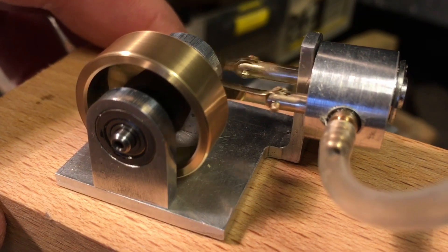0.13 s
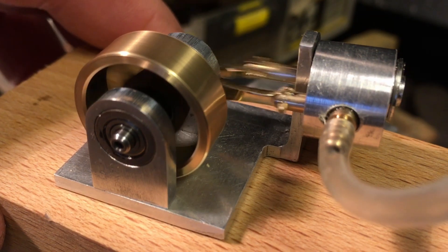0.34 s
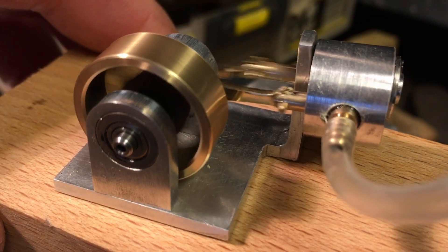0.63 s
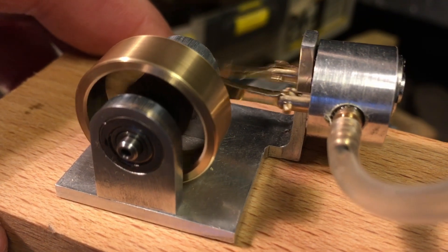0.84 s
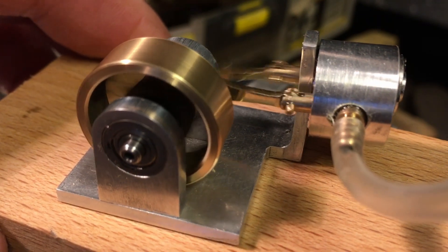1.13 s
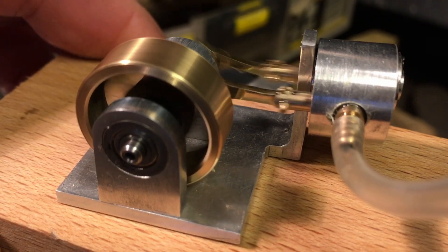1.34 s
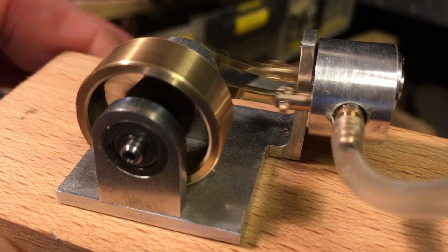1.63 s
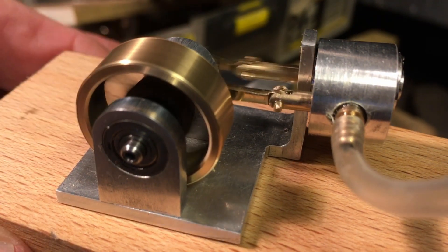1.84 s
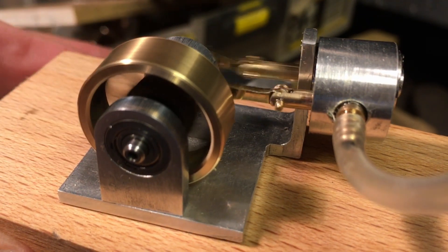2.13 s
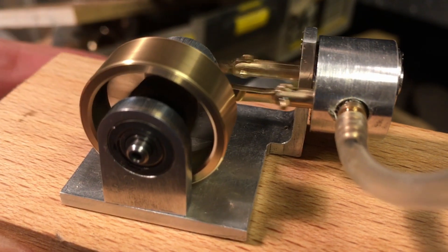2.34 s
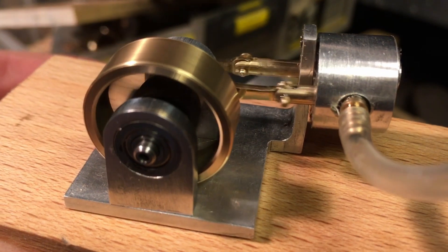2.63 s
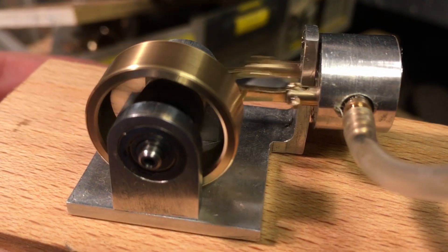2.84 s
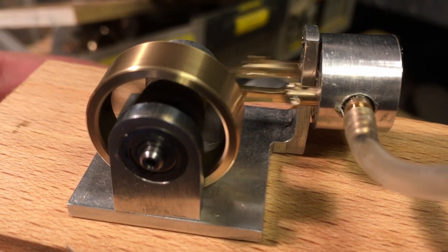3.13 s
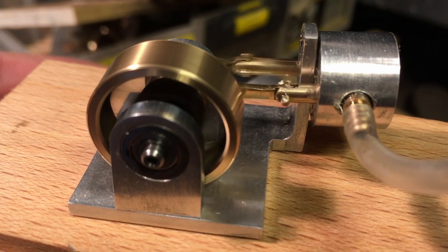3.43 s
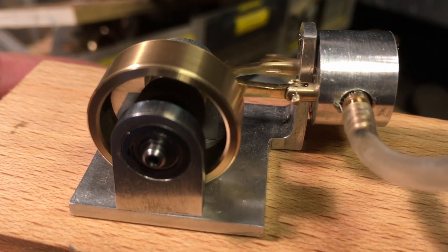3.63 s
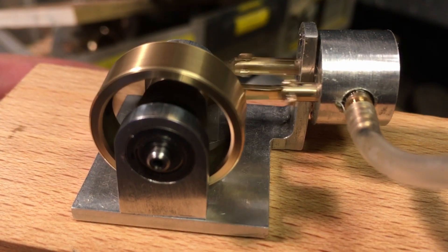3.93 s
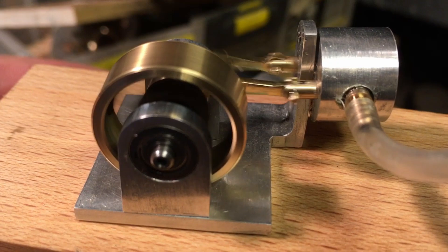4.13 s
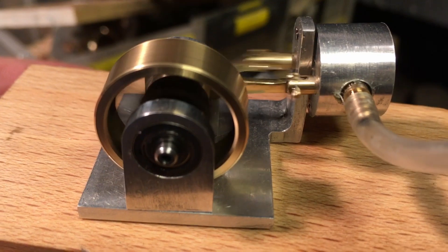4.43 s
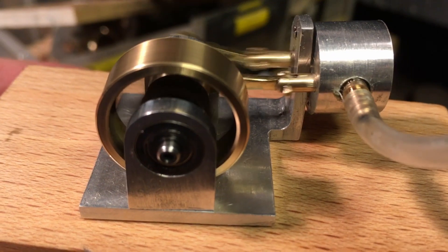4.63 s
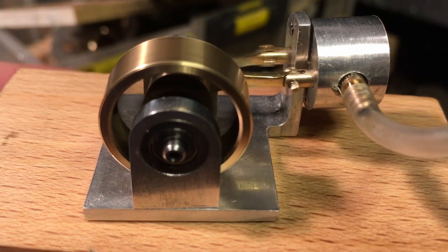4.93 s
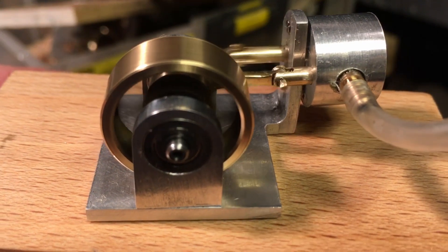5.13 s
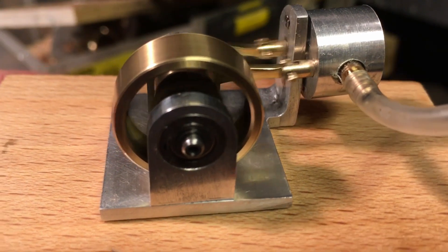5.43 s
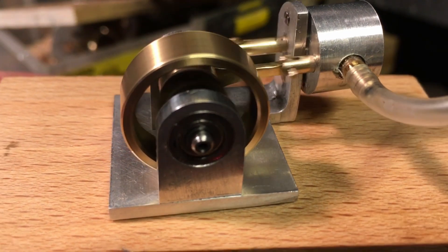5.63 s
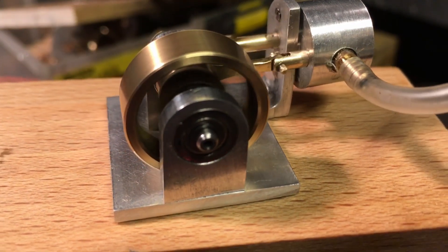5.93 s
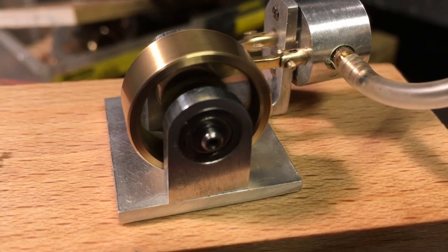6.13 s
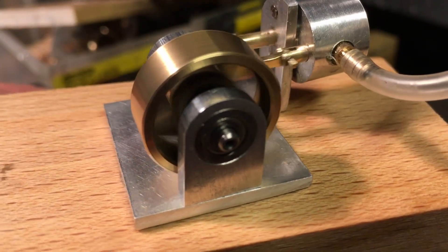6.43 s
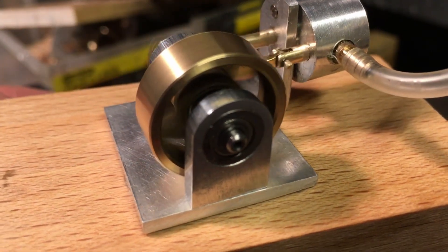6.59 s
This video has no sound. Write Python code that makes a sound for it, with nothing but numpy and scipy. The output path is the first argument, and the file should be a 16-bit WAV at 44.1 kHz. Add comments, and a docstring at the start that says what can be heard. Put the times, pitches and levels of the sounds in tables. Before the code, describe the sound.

Close, rapid puffs of high hiss and small metal clicks and rattles from a tiny running model steam engine.

```python
"""A miniature single-cylinder steam engine chuffs at about 7.6 turns a second on a hand-held wooden board.
Steam hisses on both strokes, the ports puff and whistle as they open and close, and the slack linkage
knocks at each reversal and rattles in between, ringing the metal frame. The board booms softly.
Late on it is tilted: the engine slows a little and its rattle changes.
We are close by, in a workshop with a low hum and a faint echo."""
import sys
import numpy as np
from scipy import signal
from scipy.fft import rfft, irfft
from scipy.io import wavfile
from scipy.ndimage import map_coordinates

SR = 44100
rng = np.random.default_rng(int(sys.argv[2]) if len(sys.argv) > 2 else 0)


def unload_wav(signal):
    """Save mono or channel-first audio to the path in sys.argv[1] as 16-bit WAV at rate SR, clipped to [-1, 1]."""
    wavfile.write(
        sys.argv[1],
        SR,
        np.round(np.clip(np.atleast_2d(signal).T, -1, 1) * 32767).astype(np.int16),
    )


N = 298116
TIME = np.arange(N) / SR

# The flywheel sets the tempo. Each row: time in seconds, speed in turns a second.
FLYWHEEL_SPEED = [(0.0, 7.546), (0.47, 7.451), (0.76, 7.61), (1.22, 7.621), (1.58, 7.479), (1.97, 7.596),
                  (3.0, 7.64), (3.6, 7.635), (4.5, 7.657), (4.86, 7.718), (5.43, 7.636), (5.76, 7.359),
                  (6.2, 7.327), (6.5, 7.468), (6.76, 7.378)]
# The lean of the board. Each row: time in seconds, tilt from 0 (level) to 1 (tilted).
BOARD_TILT = [(0, 0.13), (5.3, 0.1), (5.5, 1), (6.76, 0.7)]

# Three steam layers: a thin pressure leak, a finer sizzle on the outward stroke, the exhaust puffs.
# Each row: opening crank position in turns, length in turns, relative level in dB, sag by the end in dB.
LEAK_OPENINGS = [(.98, 0.14, -38.5, 13), (.16, 0.041, -43, -2), (0.943, 0.34, -47, 4.5),
                 (0.454, 0.26, -39.5, 6.5)]
SIZZLE_OPENINGS = [(.03, 0.11, -45.5, 2.7), (.175, 0.05, -47.5, 3.3)]
PUFF_OPENINGS = [(0.95, 0.028, -47.5, -1.5), (0.9065, 0.33, -56, -0.5), (0.1994, .01, -46, 0.5),
                 (0.448, 0.28, -57, 4.5)]
# Their tone colours. Each row: frequency in Hz, relative level in dB.
LEAK_EQ = [(500, -29), (1800, -22), (3000, -19), (4900, -15.5), (5600, -8.5), (6600, -8), (7600, -11.5),
           (8500, -4.5), (9400, -7), (10700, -8.5), (11700, -9), (13000, -3.5), (14200, -1.5),
           (15800, -0.5)]
SIZZLE_EQ = [(1000, -28), (9000, -39), (11500, -7), (13000, -2.5), (14300, 5), (15800, -1.5)]
PUFF_EQ = [(300, -20), (1000, -20), (1700, -11.5), (2400, -7.5), (3400, -0.5), (4100, -0.5), (4800, -0.5),
           (5700, 1.5), (6600, -10.5), (7700, -12), (9000, -2.5), (11000, -9.5), (16000, -8)]
# Their fader rides. Each row: time in seconds, then leak, puff and sizzle gains in dB.
STEAM_FADERS = [(0, -1.5, 0, 4.5), (.7, -1.3, .5, 2), (1.6, -1.5, 0, 4.5), (2.4, -2.5, 1, 0),
                (3.3, -1.5, 0, -2), (4.2, -2.5, -0.5, 1), (5.1, -2, -0.5, 0), (5.9, -2, -3, -5),
                (6.76, -2, -3, -9)]
# The hiss bounces off the base plate, sooner as the board turns. Each row: time in seconds, delay in ms.
PLATE_DELAY = [(0, 0.29), (1.3, 0.31), (2, .325), (4.3, 0.31), (5.3, 0.31), (6, 0.28), (6.76, 0.26)]
# The port whistles. Each row: loudest crank position in turns, half length in turns,
# pitch at full piston speed in Hz, level in dB.
PORT_WHISTLES = [(0.127, 0.14, 3023, -66), (.535, 0.063, 4380, -61.5), (.605, 0.022, 4325, -60),
                 (0.632, 0.051, 2834, -56.5)]

# The colours of the room tone and of the echo. Each row: frequency in Hz, relative level in dB.
ROOM_EQ = [(20, -5.5), (32, -12), (48, 9), (62, 3), (80, 5), (110, -0.5), (170, -2), (260, -5.5),
           (500, -11.5), (900, -12.5), (1220, -3), (1600, -11), (5000, -18), (16000, -12.5)]
ECHO_EQ = [(200, -10), (1200, -10), (3000, -11.5), (5000, -25), (7500, -18.5), (9000, -20), (16000, -29)]

# The ring of frame and linkage. Each row: frequency in Hz, relative level in dB, 60 dB decay in seconds.
FRAME_MODES = [(640, -33.5, 0.0055), (1163, -25, 0.0073), (1965, -22.5, 0.0085), (2560, -21, 0.0029),
               (3520, -22, 0.0093), (6200, -24.5, 0.00058), (8360, -14, 0.0067), (9620, -4, 0.0022),
               (10910, -2, 0.0012), (12620, -4, 0.0018), (14600, -10, 0.0012), (15400, -13.5, 0.0018),
               (9100, -24, 0.052)]
# The light contacts of each turn. Each row: crank position in turns, relative strength in dB
# on a level board, the same on a tilted board, extra thud in the base in dB.
RATTLE_CONTACTS = [(.021, -59, -63, 16), (.203, -58, -60, 23.5), (0.234, -48, -33, 2.5),
                   (.270, -36.5, -49, 4.5), (.276, -34.5, -40, 3), (0.29, -45.5, -47, 4),
                   (.455, -43, -43, 8), (.722, -32.5, -38.5, 0.5), (0.738, -46.5, -60, 1),
                   (0.766, -52, -55, 9), (.8, -58, -67, 17), (.811, -56, -50, 5), (0.852, -62.5, -67, 22.5),
                   (.943, -43, -57, -9)]
# The weight of the return knock and the main knock. Each row: time in seconds, relative strength in dB.
RETURN_KNOCK_WEIGHT = [(0, -29), (.7, -25.5), (1.2, -27), (1.699, -25), (2.1, -25.5), (3.1, -29),
                       (3.55, -24.5), (5.1, -28), (6.1, -25.5), (6.76, -28.5)]
MAIN_KNOCK_WEIGHT = [(0, -23), (.6, -20), (1.4, -21), (2.4, -20.5), (3, -20), (3.6, -21.5), (4.351, -19),
                     (4.8, -22.5), (5.4, -20), (5.8, -23.5), (6.2, -25), (6.76, -26)]
# Knocks that land squarely. Each row: time in seconds, extra level in dB, extra top end in dB.
KNOCK_ACCENTS = [(1.67, 2.5, 7), (3.024, 2, -1), (6.046, 0, 4), (6.182, 2, 7), (6.453, 3.5, 5)]
# The board's booms. Each row: peak time in seconds, pitch in Hz, half length in seconds, level in dB.
BOARD_BOOMS = [(.52, 199.4, 0.1, -73), (1.357, 756, .05, -72), (1.417, 205, 0.091, -75.5),
               (1.913, 196, 0.05, -76.5), (2.547, 136.3, 0.056, -71), (4.237, 230, 0.034, -74.5),
               (5.068, 199, 0.14, -73), (5.38, 197, 0.069, -68.5), (5.596, 192, 0.088, -74),
               (6.05, 200.7, 0.12, -74.5)]


def from_db(db):
    return 10 ** (np.asarray(db) / 20)


def unit_rms(x):
    return x / np.sqrt(np.mean(x ** 2) + 1e-20)


def automation(rows, times=TIME):
    """Each lane of a timed table, read at the given times."""
    row_times, *lanes = np.transpose(rows)
    return [np.interp(times, row_times, lane) for lane in lanes]


def equalise(x, eq):
    """Shape a sound with an EQ curve."""
    hz, db = np.transpose(eq)
    bin_hz = np.maximum(np.arange(len(x) // 2 + 1) * SR / len(x), 1)
    gain = from_db(np.interp(np.log(bin_hz), np.log(hz), db))
    return irfft(rfft(x) * gain, len(x))


def noise(eq):
    """Coloured noise, rms 1."""
    return unit_rms(equalise(rng.standard_normal(N), eq))


def drift(rate_hz):
    """A smooth random wobble, mostly slower than the given rate, rms 1."""
    bin_hz = np.arange(N // 2 + 1) * SR / N
    return unit_rms(irfft(rfft(rng.standard_normal(N)) / (1 + (bin_hz / rate_hz) ** 2), N))


def crank_turns(start_turns=0.1):
    """The flywheel carries the crank round: its running position in turns."""
    speed, = automation(FLYWHEEL_SPEED)
    return start_turns + np.cumsum(speed) / SR


def turns_past(crank, position):
    """How far the crank is past a position, within half a turn either way."""
    return (crank - position + .5) % 1 - .5


def steam_jet(crank, openings, eq, attack_turns, release_turns, flutter_db, flutter_hz):
    """Turbulent steam swells, sags as pressure is spent (a negative sag builds), and dies away."""
    power = 0
    for opens, length, db, sag_db in openings:
        since_open = turns_past(crank, opens + length / 2) + length / 2
        attack = np.minimum(since_open, 0) / attack_turns
        release = np.maximum(since_open - length, 0) / release_turns
        flow = from_db(db - sag_db * np.clip(since_open / length, 0, 1) ** 2)
        power += (np.exp(attack - release) * flow) ** 2
    flutter = from_db(flutter_db * drift(flutter_hz))
    return np.sqrt(power) * flutter * noise(eq)


def plate_bounce(hiss, bounce_db=-19.5):
    """The reflection off the base plate combs the hiss; the notches slide as the path changes."""
    delay_ms, = automation(PLATE_DELAY)
    reflection = map_coordinates(hiss, [np.arange(N) - delay_ms * SR / 1000], order=3)
    return hiss + from_db(bounce_db) * reflection


def breathy_tone(hz, width_hz=150, steady=1.2):
    """A gliding resonance, part pure tone and part breath, rms 1."""
    phase = 2 * np.pi * np.cumsum(hz) / SR
    return unit_rms((steady + drift(width_hz)) * np.cos(phase) + drift(width_hz) * np.sin(phase))


def port_whistles(crank, mid_stroke_turns=0.11):
    """Edge tones at the ports sound for part of a stroke and glide with the piston's speed."""
    piston_speed = np.abs(np.cos(2 * np.pi * (crank - mid_stroke_turns)))
    glide = piston_speed ** 1.8
    out = np.zeros(N)
    for position, half_length, hz, db in PORT_WHISTLES:
        swell = np.exp(-(turns_past(crank, position) / half_length) ** 2)
        out += from_db(db) * swell * breathy_tone(hz * glide)
    return out


def room_tone(hum_hz=54.7, hum_db=-69, air_db=-68.5):
    """The bed under the engine: soft room noise and a low, wavering hum."""
    hum_level = from_db(hum_db + drift(1.0))
    hum = hum_level * np.sin(2 * np.pi * hum_hz * TIME + 0.53 * drift(2.6))
    return hum + from_db(air_db) * noise(ROOM_EQ)


def workshop_echo(sound, t60_s=0.16, onset_s=0.00075):
    """Bench and walls scatter back a faint, short tail."""
    t = TIME[:16384]
    envelope = np.exp(-np.log(1000) * t / t60_s) * np.clip(t / onset_s, 0, 1)
    tail = rng.standard_normal(len(t)) * envelope
    return signal.fftconvolve(sound, equalise(tail / np.linalg.norm(tail), ECHO_EQ))[:N]


def ring(clicks, hz, t60_s):
    """One mode of the metal, ringing with unit energy after a unit click."""
    radius = np.exp(-np.log(1000) / (t60_s * SR))
    feed = np.sqrt((1 - radius ** 2) / 2) * np.array([1, 0, -1])
    feedback = [1, -2 * radius * np.cos(2 * np.pi * hz / SR), radius ** 2]
    return signal.lfilter(feed, feedback, clicks + 1e-18)


def strike_frame(times, db, thud_db, uneven_db, settle_db, sharp_db=0):
    """Each contact hits, then settles. Blunt ones thud in the base; sharp ones light up the top."""
    chance = rng.standard_normal((len(times), len(FRAME_MODES) + 1))
    settle_times = times + .0003 * from_db(3 * chance[:, -1])
    samples = (np.r_[times, settle_times] * SR).astype(int)
    heard = (samples >= 0) & (samples < N)
    tilt, = automation(BOARD_TILT, times)
    top_db = sharp_db + 5.5 * tilt  # the highest modes carry better from the tilted board
    out = np.zeros(N)
    for k, (hz, mode_db, t60_s) in enumerate(FRAME_MODES):
        colour_db = thud_db * (hz < 5000) + top_db * (hz > 13500)
        hit = from_db(db + mode_db + colour_db + uneven_db * chance[:, k])
        hit_and_settle = np.r_[hit, from_db(settle_db) * hit]
        clicks = np.bincount(samples[heard], hit_and_settle[heard], N)
        out += (-1) ** k * ring(clicks, hz, t60_s)
    return out


def rattle(crank, gain_db=10.5, scatter_turns=0.0017, scatter_db=2.5):
    """Light contacts and rebounds repeat with the crank, each turn's pattern a touch early or late."""
    position, level_db, tilted_db, thud_db = np.transpose(RATTLE_CONTACTS)
    turns = np.arange(np.ceil(crank[-1]))[:, None]
    slip = scatter_turns * rng.standard_normal(turns.shape)
    times = np.interp(turns + position + slip, crank, TIME, left=-1, right=TIME[-1] + 1)
    tilt, = automation(BOARD_TILT, times)
    db = gain_db + level_db + tilt * (tilted_db - level_db)
    db += scatter_db * rng.standard_normal(times.shape)
    thuds_db = np.tile(thud_db, len(turns))
    return strike_frame(times.ravel(), db.ravel(), thuds_db, uneven_db=1.5, settle_db=-5.5)


def knocks(crank, weight, at_turns, gain_db, thud_db, scatter_db):
    """Once a turn the slack in the linkage is taken up with a sharp tick, never twice equally hard."""
    turns = np.arange(np.ceil(crank[-1])) + at_turns
    times = np.interp(turns[(turns > crank[0]) & (turns < crank[-1])], crank, TIME)
    accent_times, louder_db, brighter_db = np.transpose(KNOCK_ACCENTS)
    accented = np.abs(times[:, None] - accent_times) < .01
    weight_db, = automation(weight, times)
    db = gain_db + weight_db + accented @ louder_db + scatter_db * rng.standard_normal(len(times))
    return strike_frame(times, db, thud_db, uneven_db=1.1, settle_db=-8, sharp_db=accented @ brighter_db)


def board_booms():
    """The hand-held board booms in soft, wavering swells."""
    waver = drift(7.2)
    tremble = from_db(1.4 * drift(8.8))
    out = np.zeros(N)
    for peak_s, hz, half_length, db in BOARD_BOOMS:
        swell = np.exp(-((TIME - peak_s) / half_length) ** 2)
        out += from_db(db) * swell * np.sin(2 * np.pi * hz * TIME + waver)
    return tremble * out


def scene():
    """The crank cues steam and metal alike; the whole mix sits a little to the right."""
    crank = crank_turns()
    leak = steam_jet(crank, LEAK_OPENINGS, LEAK_EQ,
                     attack_turns=0.018, release_turns=0.018, flutter_db=2.2, flutter_hz=350)
    sizzle = steam_jet(crank, SIZZLE_OPENINGS, SIZZLE_EQ,
                       attack_turns=0.03, release_turns=0.01, flutter_db=3.0, flutter_hz=97)
    puffs = steam_jet(crank, PUFF_OPENINGS, PUFF_EQ,
                      attack_turns=0.011, release_turns=0.012, flutter_db=0.5, flutter_hz=380)
    leak_db, puff_db, sizzle_db = automation(STEAM_FADERS)
    hiss = from_db(leak_db) * leak + from_db(sizzle_db) * sizzle + from_db(puff_db) * puffs
    steam = plate_bounce(hiss) + port_whistles(crank)
    metal = knocks(crank, MAIN_KNOCK_WEIGHT, at_turns=0, gain_db=9.5, thud_db=-6.5, scatter_db=0.2)
    metal += knocks(crank, RETURN_KNOCK_WEIGHT, at_turns=0.709, gain_db=11, thud_db=-1, scatter_db=1)
    metal += rattle(crank)
    engine = steam + metal
    mix = engine + workshop_echo(engine) + room_tone() + board_booms()
    pan = from_db([[-1.5], [1.5]])
    return mix * pan


def record(dry):
    """A steep low-pass takes off the very top."""
    low_pass = signal.ellip(12, .1, 70, 15900, fs=SR, output="sos")
    return signal.sosfilt(low_pass, dry)


dry = scene()
out = record(dry)
unload_wav(out)
```